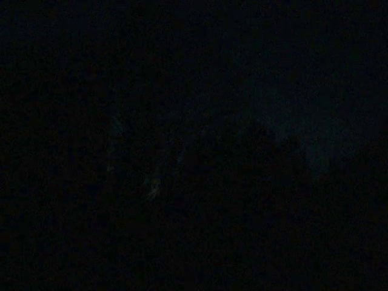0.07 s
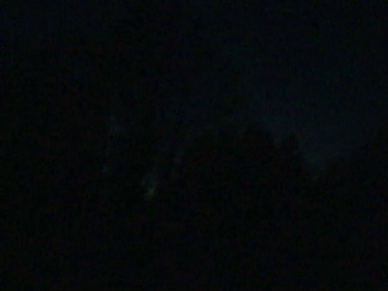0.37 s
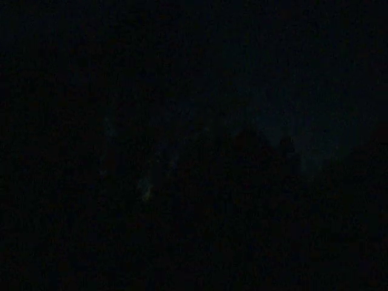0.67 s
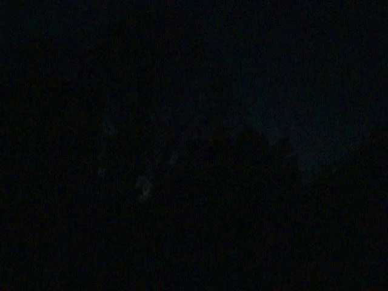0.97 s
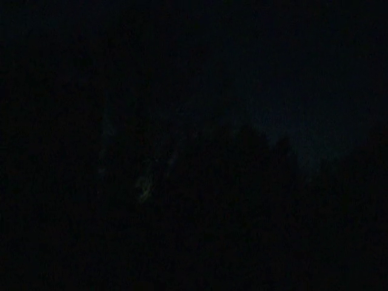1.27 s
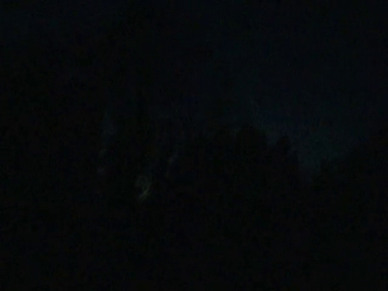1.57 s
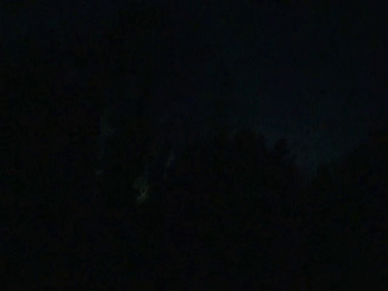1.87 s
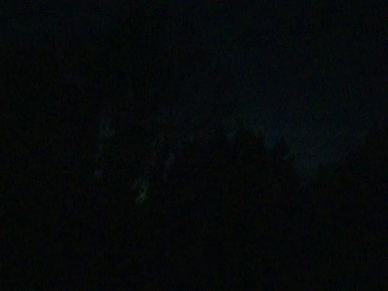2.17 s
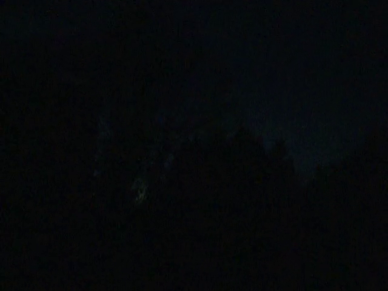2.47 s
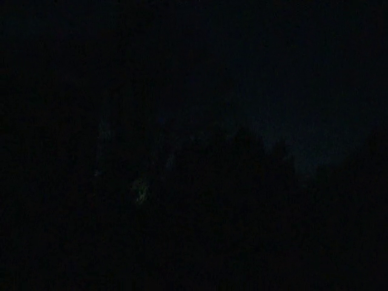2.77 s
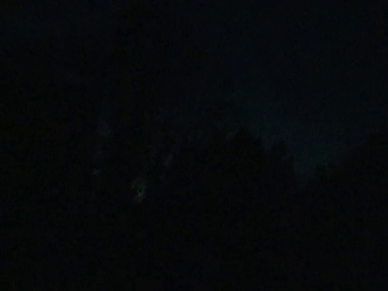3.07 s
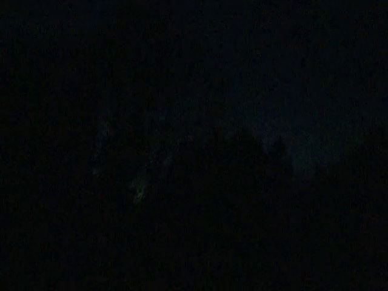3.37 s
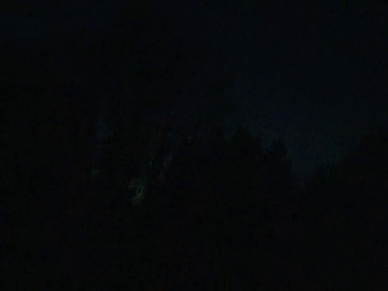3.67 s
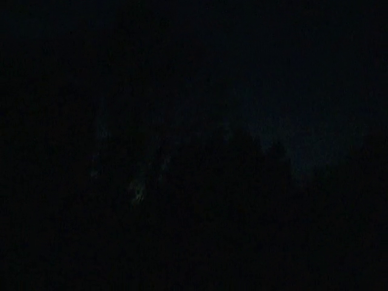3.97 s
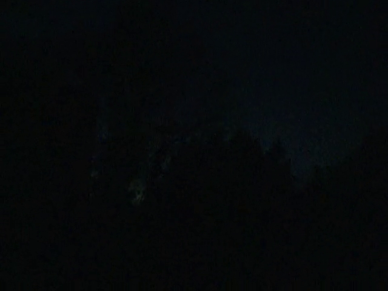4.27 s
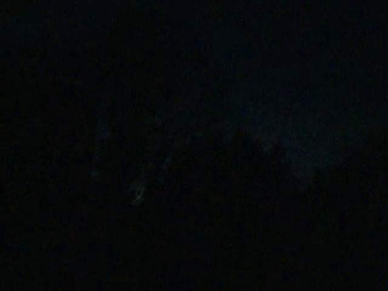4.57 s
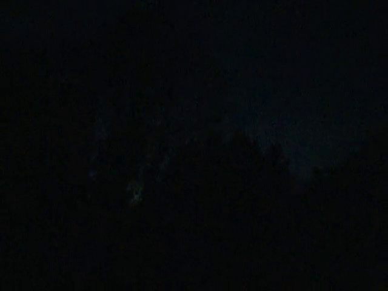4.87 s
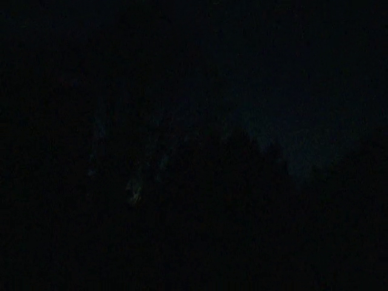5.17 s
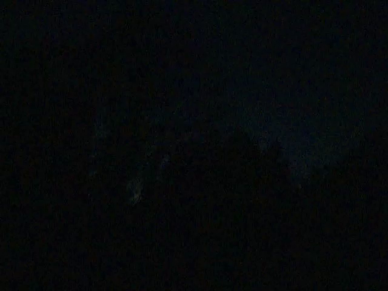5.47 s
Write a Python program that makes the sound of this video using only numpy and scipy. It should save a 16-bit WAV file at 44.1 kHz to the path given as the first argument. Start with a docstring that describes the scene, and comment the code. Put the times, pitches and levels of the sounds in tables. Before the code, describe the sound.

A hand-held camera switches on with a sharp pop, and its plastic buttons click softly close to the microphone. A small owl in the night wood gives one short whistle, a quick downward flick into a held note, echoed by the trees. A soft rustle follows, then more clicks, then a second matching whistle. Quiet, muffled hiss runs underneath, and everything sounds narrow, like a telephone line.

```python
"""Owl in a dark wood

A small owl whistles twice: a quick downward flick into a held note, thrown back by the trees.
A hand-held camera pops as it switches on; its plastic buttons click close to the microphone.
Quiet narrow-band hiss lies under everything, with one soft rustle between the calls."""
import sys
import numpy as np
from scipy import signal
from scipy.fft import rfft, irfft, next_fast_len
from scipy.io import wavfile
from scipy.ndimage import uniform_filter1d

SR = 44100
rng = np.random.default_rng(int(sys.argv[2]) if len(sys.argv) > 2 else 0)


def wrap_up_sound(samples):
    """Save the sound to the file named by the first command line argument, as 16-bit audio."""
    columns = np.atleast_2d(samples).T
    # keep every value between -1 and 1, then stretch to whole-number steps
    tamed = np.clip(columns, -1, 1)
    steps = np.round(tamed * 32767).astype(np.int16)
    wavfile.write(sys.argv[1], SR, steps)


N = 242991

# hiss spectrum: freq_hz, gain_db
HISS_SPECTRUM = [(30, -21), (100, -13), (200, -10), (280, -3.5), (350, -4.5), (500, -5), (610, -1.5),
                 (710, -5), (930, -2), (1150, -9.5), (1600, -11.5), (2200, -14.5), (3000, -16), (3550, -13)]
# hollow resonances in the hiss: freq_hz, width_hz, gain_db
HISS_RESONANCES = [(405.4, 32, -1), (812.5, 23, -1.5)]
# rustle spectrum: freq_hz, gain_db
RUSTLE_SPECTRUM = [(500, -16), (1500, -2.5), (2300, 0), (3500, -10), (4500, -20)]
# switch-on pulses: start_s, length_s, level_db
POWER_POPS = [(0.036, .00072, -4), (0.0398, 0.00054, -9)]
# button presses: start_s, hardness_db, treble_db, middle_db, knock_db
PRESSES = [(0.551, -24, -34.5, -42, -35.5), (0.644, -22, -22, -28, -37), (0.776, -12.5, -37.5, -31.5, -32),
           (0.881, -32, -34.5, -36.5, -30.5), (1.152, -0.5, -14, -14, -27), (1.277, -29.5, -48, -36, -41.5),
           (1.31, -29, -36, -44.5, -34), (1.442, -25, -53, -36, -37), (1.51, -8, -32, -41, -30.5),
           (1.717, -24.5, -44, -38, -32.5), (3.51, -25, -39, -29.5, -37.5), (3.716, -26, -34, -40, -31.5),
           (3.844, -12, -39, -39, -32), (4.051, -22, -34.5, -38.5, -30), (4.072, -30, -42, -52, -44.5),
           (4.092, -23, -41, -50.5, -46), (4.277, -22, -41.5, -33.5, -37), (5.164, -15, -40, -23.5, -47)]
# light first touch: freq_hz, gain_db
TOUCH_SPECTRUM = [(150, -24.5), (700, -7.5), (1500, -7), (2300, -3), (3100, 3.5), (4000, -18)]
# plastic snap: freq_hz, gain_db
SNAP_SPECTRUM = [(150, -25.5), (400, -1.5), (900, -7), (1500, 2.5), (2300, 1.5), (3100, 3), (4000, -4.5)]
# camera case modes: freq_hz, gain_db, t60_s
CASE_MODES = [(312, -2, 0.11), (392.4, -4.5, 0.056), (617.5, -3.5, 0.042), (802.6, -10, 0.13),
              (1061, -11, 0.042), (2175, -10.5, 0.036)]
# weak bass radiation of the small case: freq_hz, gain_db
CASE_RADIATION = [(60, -35.5), (150, -24.5), (220, -0.5), (290, 0.5)]
# ground and nearest trees: delay_s, gain_db
NEAR_ECHOES = [(.02353, -6), (.06107, -11), (.11341, -5), (.13118, -10.5), (.15711, -18.5), (.21174, -18)]
# bark and leaves mirror the held note: freq_hz, gain_db
MIRROR_RESPONSE = [(1320, 0), (1450, -4)]
# they scatter the higher flick: freq_hz, gain_db
SCATTER_RESPONSE = [(1320, -28), (1500, 2.5)]
# throat, passing the octave only on the low note: freq_hz, gain_db
THROAT_RESPONSE = [(2530, 3), (2620, -8.5), (2900, -17)]
# owl calls: start_s, pitch_ratio, length_s, gain_db
CALLS = [(2.14, 1.0, .228, 0), (5.023, .9966, .21, 0)]
# telephone-like treble cutoff near 3.7 kHz: freq_hz, gain_db
TREBLE_CUTOFF = [(3550, 0.5), (3800, -7.5), (4000, -15), (4250, -20.5), (4500, -44.5), (4800, -86)]


def undb(db):
    """Decibels to gain."""
    return 10 ** (np.asarray(db) / 20)


def level(x, rms_db):
    """Scale to an rms level."""
    return x * undb(rms_db) / np.sqrt(np.mean(x ** 2))


def colour(x, points):
    """Filter by (freq_hz, gain_db) points joined on a log-frequency axis."""
    hz, db = np.transpose(points)
    size = next_fast_len(2 * len(x))
    bins_hz = np.maximum(np.arange(size // 2 + 1) * SR / size, 1)
    gain = undb(np.interp(np.log(bins_hz), np.log(hz), db))
    return irfft(rfft(x, size) * gain, size)[:len(x)]


def fade(t, t60_s):
    """Exponential decay, 60 dB down at t60_s."""
    return np.exp(-np.log(1000) * t / t60_s)


def walk(rate_hz):
    """Smooth random wander, unit rms."""
    hold = int(SR / rate_hz)
    steps = np.repeat(rng.standard_normal(N // hold + 1), hold)
    return level(uniform_filter1d(uniform_filter1d(steps, hold), hold)[:N], 0)


def add(out, start_s, sound):
    """Mix a sound in at start_s."""
    i = int(round(start_s * SR))
    out[i:i + len(sound)] += sound[:len(out) - i]


def night_hiss(hiss_db=-43.5, hum_db=-62, hum_hz=145.2, waver_db=3.5):
    """Soft hiss with two hollow resonances and a faint wavering hum."""
    hiss = colour(rng.standard_normal(N), HISS_SPECTRUM + [(4500, -12.5), (6000, -57.5)])
    hollow = sum(undb(db) * signal.lfilter(*signal.iirpeak(hz, hz / width_hz, SR), hiss)
                 for hz, width_hz, db in HISS_RESONANCES)
    flicker = undb(.4 * walk(14))
    hum_phase = 2 * np.pi * np.cumsum(hum_hz + 3 * walk(8.5)) / SR
    hum = np.sin(hum_phase) * undb(waver_db * walk(13))
    return level(hiss + hollow, hiss_db) * flicker + level(hum, hum_db)


def rustle(start_s=2.76, length_s=.27, level_db=-50.5, grain_db=1.0):
    """Soft grainy noise that swells and fades once."""
    progress = np.clip((np.arange(N) / SR - start_s) / length_s, 0, 1)
    grains = rng.standard_normal(N) * undb(grain_db * walk(200))
    return level(colour(grains, RUSTLE_SPECTRUM), level_db) * np.sin(np.pi * progress)


def switch_on():
    """The input stage jumps to its rail twice as it powers up."""
    out = np.zeros(N)
    for start_s, length_s, level_db in POWER_POPS:
        add(out, start_s, -undb(level_db) * np.ones(int(length_s * SR)))
    return colour(out, [(3500, 1), (5000, -3.5), (16000, -5.0)])


def contact(spectrum, t60_s, rattle_db):
    """Sharp impact and brief rattle, with the energy of 1 ms at unit rms."""
    t = np.arange(SR // 20) / SR
    rattle = rng.standard_normal(len(t)) * fade(t, t60_s)
    force = undb(rattle_db) * rattle / np.linalg.norm(rattle)
    force[0] += 1
    burst = colour(np.pad(force, (SR // 1000, 0)), spectrum)
    burst = signal.sosfilt(signal.butter(6, 4500, fs=SR, output="sos"), burst)
    return burst / np.linalg.norm(burst) * np.sqrt(SR / 1000)


def case_knock(rise_s=.0016):
    """The hollow case rings; the grip shifts its modes, the finger cushions the blow."""
    t = np.arange(SR // 8) / SR
    detunes = 1 + .016 * rng.standard_normal(len(CASE_MODES))
    phases = rng.random(len(CASE_MODES))
    ring = sum(undb(db) * fade(t, t60_s) * np.sin(2 * np.pi * (hz * detune * t + phase))
               for (hz, db, t60_s), detune, phase in zip(CASE_MODES, detunes, phases))
    return ring * (1 - np.exp(-t / rise_s))


def buttons(lead_s=.0007, touch_lead_s=.0075):
    """Each button is touched, snaps home and knocks the case; softer presses rattle more."""
    out = np.zeros(N)
    for start_s, hardness_db, treble_db, middle_db, knock_db in PRESSES:
        snap_s = start_s - lead_s
        touch = contact(TOUCH_SPECTRUM, t60_s=.062, rattle_db=9)
        touch_db = .85 * knock_db + .15 * treble_db
        add(out, snap_s - touch_lead_s, undb(touch_db) * touch)
        snap = contact(SNAP_SPECTRUM, t60_s=.023, rattle_db=-6 - .55 * hardness_db)
        add(out, snap_s, colour(snap, [(1300, middle_db + 9.5), (1700, treble_db + 3.5)]))
        add(out, snap_s, undb(knock_db + 5) * case_knock())
    return colour(out, CASE_RADIATION)


def scatter(x, gain_db, t60_s, build_s):
    """Diffuse tail of countless small reflections."""
    t = np.arange(2 * SR) / SR
    response = rng.standard_normal(len(t)) * fade(t, t60_s) * np.minimum(t / build_s, 1) ** 2
    return undb(gain_db) * signal.fftconvolve(x, response / np.linalg.norm(response))[:N]


def far_trunks(count=15, first_s=.11, last_s=.36, gain_db=-26, t60_s=5):
    """Echoes from random distances, weaker when later: delay_s, gain_db."""
    lag_s = (last_s - first_s) * (np.arange(count) + rng.random(count)) / count
    return list(zip(first_s + lag_s, gain_db + 20 * np.log10(fade(lag_s, t60_s))))


def wood(tone, octave):
    """Direct call plus echoes that beat against the glide; shorter waves mostly scatter."""
    t = np.arange(SR // 2) / SR
    trees = sum(undb(db) * np.sinc((t - delay_s) * SR) for delay_s, db in NEAR_ECHOES + far_trunks())
    echoes = signal.fftconvolve(colour(tone, MIRROR_RESPONSE), trees)[:N]
    bushes = scatter(colour(tone, SCATTER_RESPONSE), gain_db=-6, t60_s=.47, build_s=.0097)
    octave_tail = scatter(octave, gain_db=-.5, t60_s=.49, build_s=.12)
    deep_wood = scatter(tone + echoes, gain_db=-27, t60_s=1.3, build_s=.35)
    return tone + octave + echoes + bushes + octave_tail + deep_wood


def call_pitch_hz(t, length_s, flick_hz=1700, note_hz=1266, hold_s=.018, drop_s=.0115, lift_hz=28):
    """A high flick sinks into the low note, which lifts a little past mid-call."""
    drop = np.exp(-np.maximum(t - hold_s, 0) / drop_s)
    lift = 1 / (1 + np.exp((.605 * length_s - t) / .008))
    return note_hz + (flick_hz - note_hz) * drop + lift_hz * lift


def call_envelope(t, length_s, peak_s=.026, note_start_s=.038, attack_s=.016):
    """The flick swells, the voice breaks briefly, the held note sags and is released."""
    flick_db, note_db = -23, -23.5
    swell_db_per_s, break_db_per_s, sag_db_per_s = 950, 1700.5, 23.5
    flick = undb(flick_db - np.maximum(swell_db_per_s * (peak_s - t), break_db_per_s * (t - peak_s)))
    note = np.clip((t - note_start_s) / attack_s, 0, 1) * undb(note_db - sag_db_per_s * t)
    release = fade(np.maximum(t - length_s, 0), t60_s=.19)
    return flick + note * release


def owl(octave_db=-25, quiver_db=1.7):
    """Nearly pure, quivering whistle and its faint throat-filtered octave."""
    tone, octave = np.zeros(N), np.zeros(N)
    t = np.arange(SR // 2) / SR
    for start_s, pitch_ratio, length_s, gain_db in CALLS:
        phase = 2 * np.pi * np.cumsum(pitch_ratio * call_pitch_hz(t, length_s)) / SR
        effort = undb(gain_db) * call_envelope(t, length_s)
        add(tone, start_s, effort * np.sin(phase))
        add(octave, start_s, effort * undb(octave_db) * np.sin(2 * phase))
    quiver = undb(quiver_db * walk(150))
    return tone * quiver, colour(octave * quiver, THROAT_RESPONSE)


def scene():
    """Owl in the wood, buttons at hand, hiss and rustle; mono."""
    return (wood(*owl()) + buttons() + night_hiss() + rustle())[None]


def record(dry, cutoff_hz=16900):
    """Telephone-like channel that opens with the switch-on pops."""
    awake = np.arange(N) / SR > POWER_POPS[-1][0]
    sound = colour(dry[0] * awake, TREBLE_CUTOFF) + switch_on()
    lowpass = signal.ellip(8, .2, 70, cutoff_hz, fs=SR, output="sos")
    return signal.sosfilt(lowpass, sound)[None]


dry = scene()
out = record(dry)
wrap_up_sound(out)
```